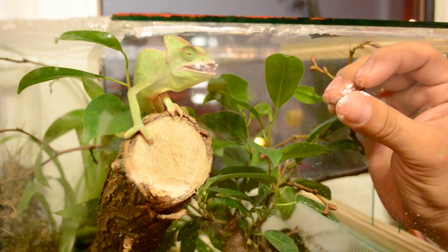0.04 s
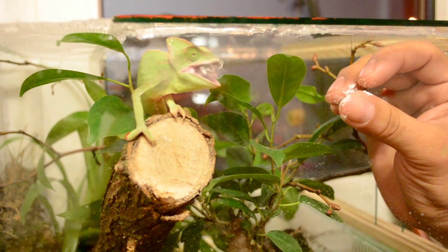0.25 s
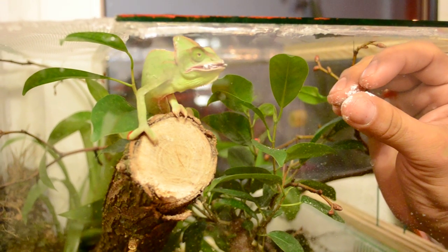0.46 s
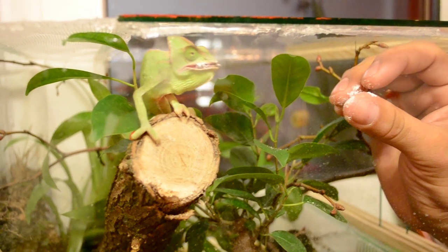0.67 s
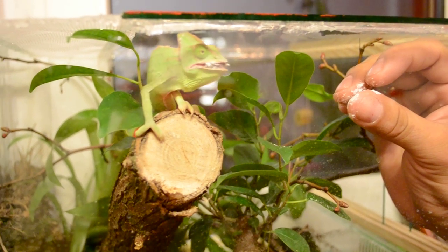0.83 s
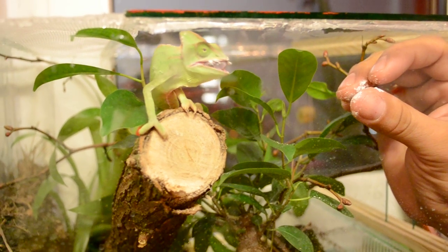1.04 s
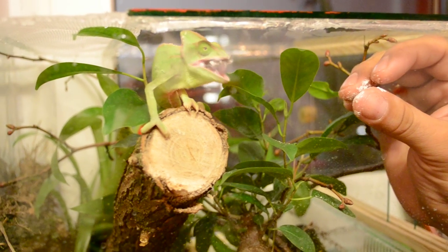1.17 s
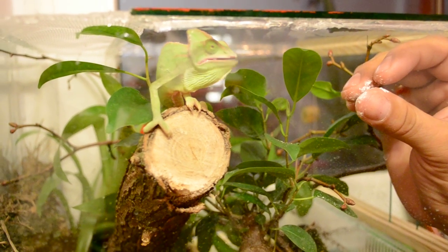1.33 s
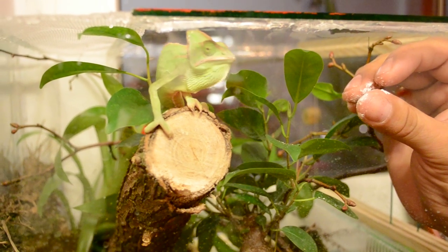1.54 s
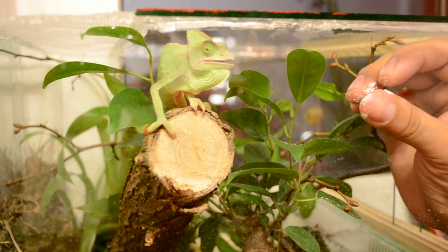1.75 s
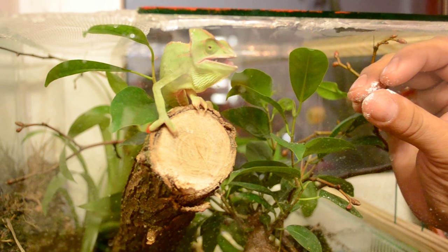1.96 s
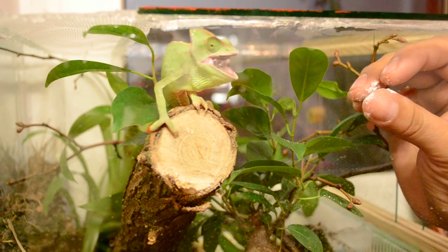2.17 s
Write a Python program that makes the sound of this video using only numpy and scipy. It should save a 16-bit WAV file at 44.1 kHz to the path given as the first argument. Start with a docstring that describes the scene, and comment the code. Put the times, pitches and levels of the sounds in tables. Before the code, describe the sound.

A chameleon crunches an insect in a glass tank. A sharp double crack comes at about 0.2 seconds, a slightly weaker crack at 0.4, and a much softer, dull click near 0.8, each dying away quickly. Very faint chewing rustles sound around the first cracks and near 1.4 seconds. Steady room noise and the quiet hum of a small fan continue to the end, at about 2 seconds.

```python
"""A chameleon chews an insect: the shell cracks twice quickly, once more, then gives softly.
Each crack rings for a moment, bounces off a near surface and dies away in the glass tank.
The working jaws add dull knocks and faint rustles.
Behind it, the blades of a small fan hum over steady room noise."""
import sys
import numpy as np
from scipy import signal
from scipy.fft import rfft, irfft
from scipy.io import wavfile

SR = 44100
rng = np.random.default_rng(int(sys.argv[2]) if len(sys.argv) > 2 else 0)


def wav_out(sig):
    """Save sig, one row per channel (or a flat mono array), as 16-bit PCM at SR to the path in sys.argv[1]."""
    wavfile.write(sys.argv[1], SR, np.round(np.clip(np.atleast_2d(sig).T, -1, 1) * 32767).astype(np.int16))


N = 97020  # 2.2 seconds


def undb(db):
    """Turn decibels into a number to multiply by."""
    return 10 ** (np.asarray(db) / 20)


def level(x, db):
    """Scale a sound to an average (rms) level."""
    return x * undb(db) / np.sqrt(np.mean(x ** 2))


def noise(gain):
    """Noise of average level 1; gain(hz) says how strong each pitch is."""
    hz = np.maximum(np.fft.rfftfreq(N, 1 / SR), 1)
    return level(irfft(rfft(rng.standard_normal(N)) * gain(hz)), 0)


def band(hz, width_hz):
    """Noise that is strongest around one pitch."""
    return noise(lambda f: 1 / (1 + ((f * f - hz * hz) / (f * width_hz)) ** 2))


def drift(rate_hz):
    """A smooth random wobble of typical size 1."""
    return noise(lambda f: np.exp(-(f / rate_hz) ** 2))


def fade(age, fade_s):
    """Zero before age 0, then a fall from 1 that loses 60 dB every fade_s."""
    return (age >= 0) * np.exp(-np.log(1000) * np.maximum(age, 0) / fade_s)


def room():
    """A steady rush of air, plus a low drone where the room resonates."""
    # the tone colour of the air: pitch_hz, relative_db
    air_shape = [(25, -22), (50, -45), (110, -7.5), (140, -3), (230, -1), (350, 3.5), (560, -0.5),
                 (850, -3), (1100, -2.5), (1500, -5), (2650, -5.5), (3150, -14.5), (4000, -15.5),
                 (4700, -14), (5500, -24), (7800, -32), (8700, -31), (10400, -36.5), (11500, -50.5)]
    # the room's resonances: pitch_hz, width_hz, level_db
    resonances = [(69.4, 19, -73.5), (168.4, 43, -66.5), (189.3, 8, -62.5), (247.3, 24, -72.5),
                  (320.2, 35, -59.5), (418, 30, -67.5), (495, 22, -69.5)]
    air_hz, air_db = np.array(air_shape).T
    air = noise(lambda f: undb(np.interp(np.log(f), np.log(air_hz), air_db)))
    drone = sum(undb(db) * band(hz, width) for hz, width, db in resonances)
    wavering_db = -53 + 0.45 * drift(rate_hz=36)
    return undb(wavering_db) * air + drone


def fan():
    """Spinning blades make a slightly wavering hum with two overtones."""
    # the tones of the hum: multiple of blade_hz, level_db
    tones = [(1, -58.5), (2, -61.5), (3, -68)]
    blade_hz, wander, flutter_db = 343.9, 0.00525, 2.5
    pitch_hz = blade_hz * (1 + wander * drift(rate_hz=7.7))
    phase = 2 * np.pi * np.cumsum(pitch_hz) / SR
    return sum(level(np.sin(multiple * phase) * undb(flutter_db * drift(rate_hz=44)), db)
               for multiple, db in tones)


def rustle(t):
    """Thin, grainy rustles swell and fade as the jaws work."""
    # chewing rustles: middle_s, half_length_s, level_db, pitch_hz, width_hz
    rustles = [(0.116, 0.079, -78.5, 8400, 4000), (0.247, 0.034, -73.5, 7760, 5000),
               (1.36, 0.17, -78.5, 6300, 1100)]
    rough_db = 2
    out = np.zeros(N)
    for middle_s, half_s, db, hz, width in rustles:
        grains = band(hz, width) * undb(rough_db * drift(rate_hz=150))
        swell = np.exp(-((t - middle_s) / half_s) ** 2)
        out += swell * level(grains, db)
    return out


def ring(age, tones, tilt_db=0):
    """A brief push starts fading tones; neighbours swing opposite ways. Tilt above 0 is brighter."""
    rise_s, pivot_hz = 0.00011, 2700
    push = 1 - np.exp(-np.maximum(age, 0) / rise_s)
    out = np.zeros(N)
    for k, (hz, db, fade_s) in enumerate(tones):
        gain = (-1) ** k * undb(db + tilt_db * np.log2(hz / pivot_hz))
        out += gain * fade(age, fade_s) * np.sin(2 * np.pi * hz * age)
    return push * out


def terrarium(sound, t):
    """Add the short, dull echo of sound scattering between the glass panes."""
    delay_s, pitch_hz, width_hz, echo_db = 0.002, 1600, 1800, -14
    echo = fade(t - delay_s, fade_s=0.035) * band(pitch_hz, width_hz)
    echo_strength = np.sqrt(np.sum(echo ** 2) * SR / (2 * width_hz))
    echo *= undb(echo_db) / echo_strength
    return sound + signal.fftconvolve(sound, echo)[:N]


def cracks(t):
    """Each break rings the shell, knocks the jaw, snaps, ticks and bounces off a near surface."""
    # the breaks, with a gain for each part:
    # start_s, shell_db, tilt_db_per_octave, tick_db, snap_db, knock_db, bounce_db
    breaks = [(0.2268, -19, 0.5, -33, -28, -45.5, -7), (0.2426, -31, 1.5, -31, -30.5, -36, -42),
              (0.4019, -28.5, -3, -43, -49, -44.5, -11), (0.7662, -64, -11, -77, -70, -54.5, 7)]
    # the ringing shell: pitch_hz, relative_db, fade_s
    shell_tones = [(800, -29.5, 0.047), (1374, -12, 0.03), (1764, -16, 0.035), (2150, -12, 0.031),
                   (2365, -5, 0.025), (2757, 4.5, 0.0098), (3420, -21, 0.016), (3668, -2, 0.013),
                   (4054, -5, 0.0087), (4820, -10, 0.012), (5725, -8.5, 0.01), (6540, -16.5, 0.011),
                   (7400, -14.5, 0.0096)]
    # the jaw's dull knock: pitch_hz, relative_db, fade_s
    jaw_tones = [(680, 1.5, 0.025), (1225, 0, 0.025), (1777, -1, 0.032)]
    # a splinter's short snap: pitch_hz, relative_db, fade_s
    snap_tones = [(3678, 6.5, 0.012), (4370, -16.5, 0.029)]
    # the brittle tick on top: pitch_hz, relative_db, fade_s
    tick_tones = [(8510, 0.3, 0.0051), (9530, -5.5, 0.0062), (10520, -11.5, 0.004)]
    bounce_s, low_cut_hz = 0.00117, 500
    out = np.zeros(N)
    for start_s, shell_db, tilt_db, tick_db, snap_db, knock_db, bounce_db in breaks:
        age = t - start_s
        crack = undb(shell_db) * ring(age, shell_tones, tilt_db)
        crack += undb(knock_db) * ring(age, jaw_tones)
        crack += undb(snap_db) * ring(age, snap_tones)
        crack += undb(tick_db) * ring(age, tick_tones)
        bounce = undb(bounce_db) * np.interp(t - bounce_s, t, crack, left=0)
        out += crack + bounce
    # the cracks give off little bass
    return signal.sosfilt(signal.butter(2, low_cut_hz, "high", fs=SR, output="sos"), out)


def scene():
    """The chewing in its tank, over fan and room, in one channel."""
    t = np.arange(N) / SR
    return (terrarium(cracks(t), t) + rustle(t) + fan() + room())[None]


def record(dry):
    """Cut away the highest treble."""
    top_hz = 11100
    return signal.sosfilt(signal.ellip(8, .2, 70, top_hz, fs=SR, output="sos"), dry)


dry = scene()
out = record(dry)
wav_out(out)
```